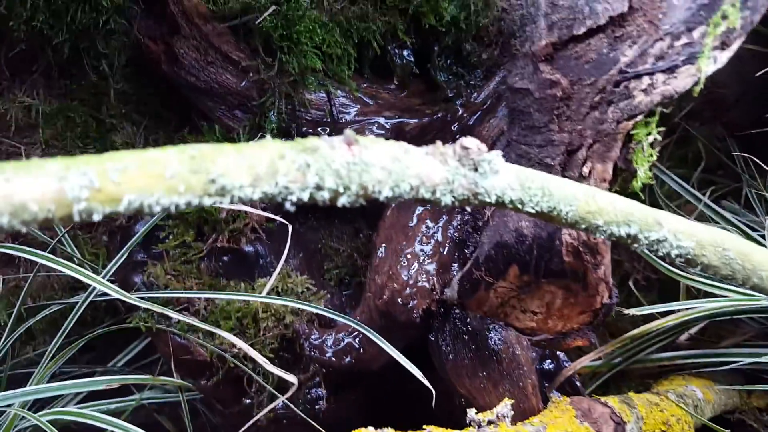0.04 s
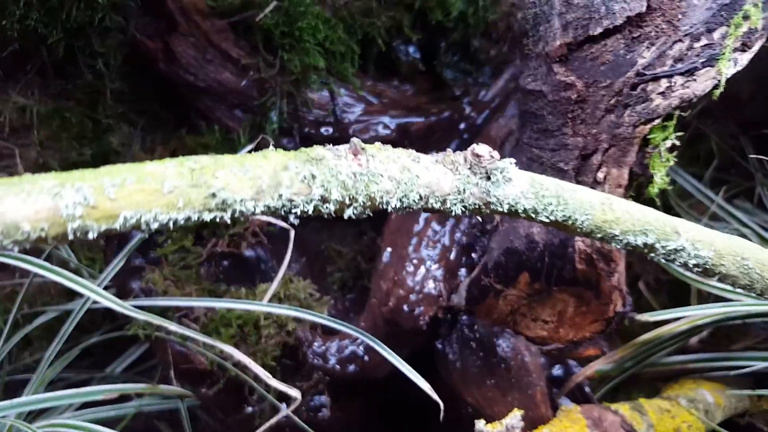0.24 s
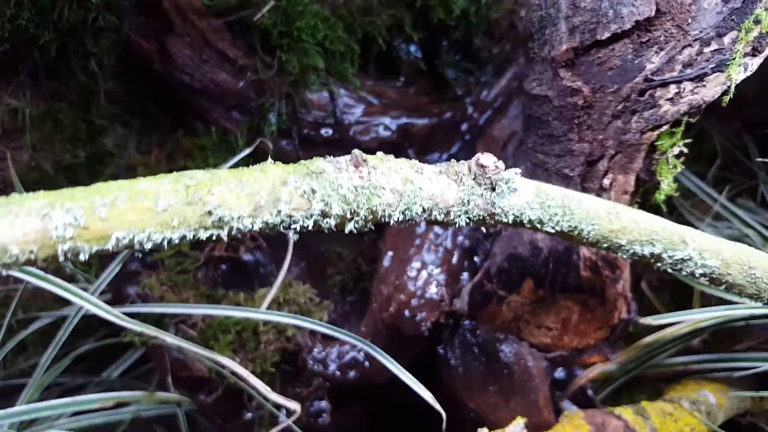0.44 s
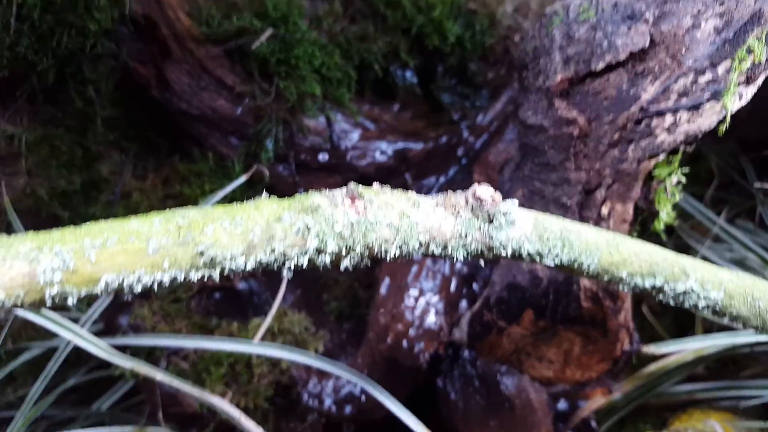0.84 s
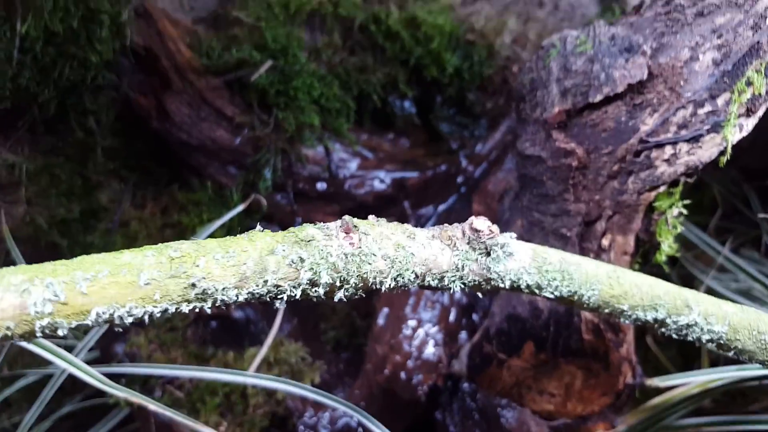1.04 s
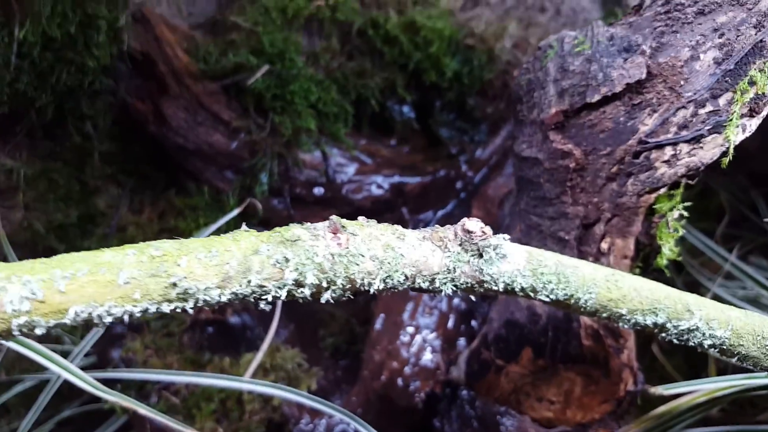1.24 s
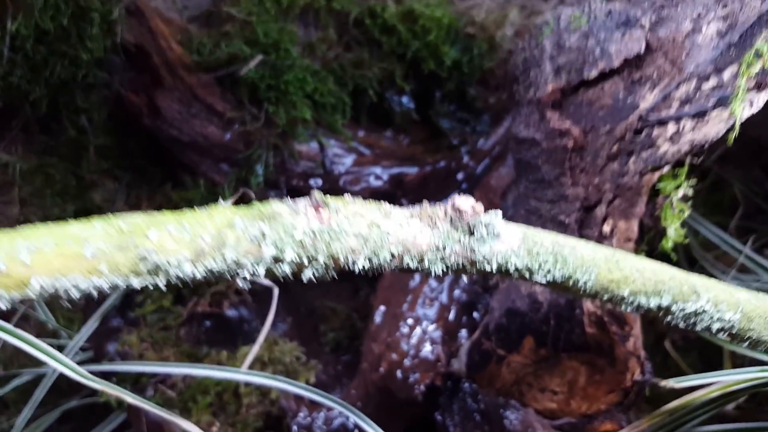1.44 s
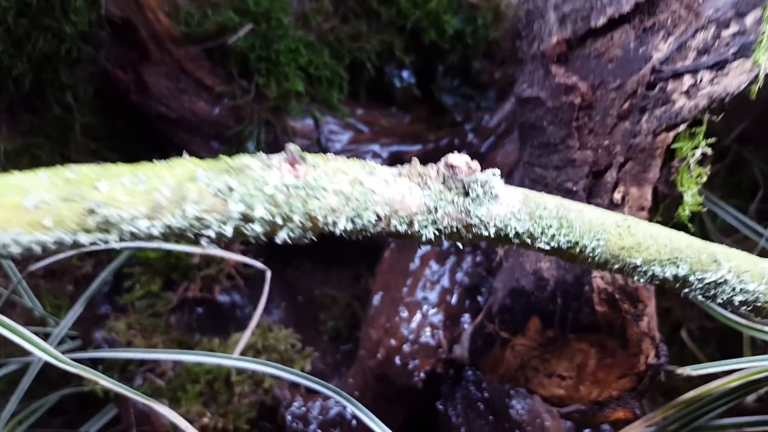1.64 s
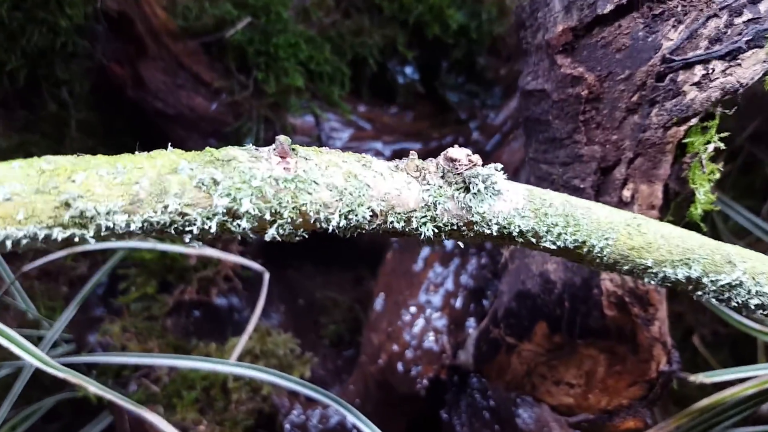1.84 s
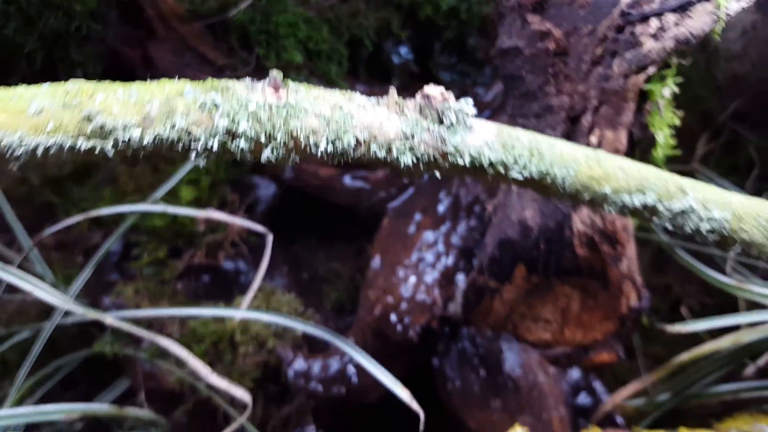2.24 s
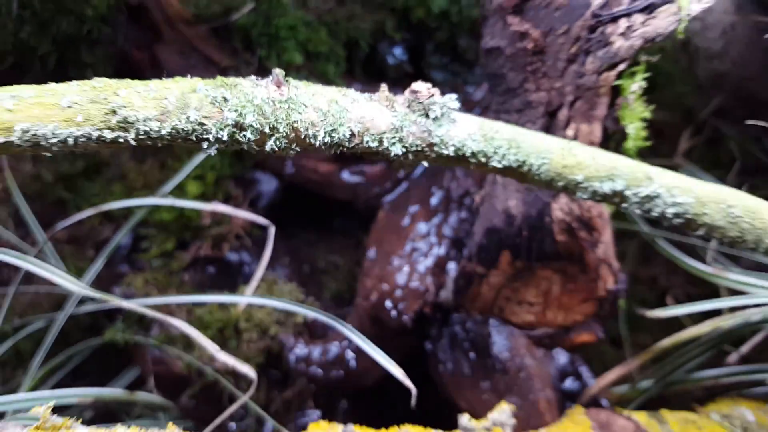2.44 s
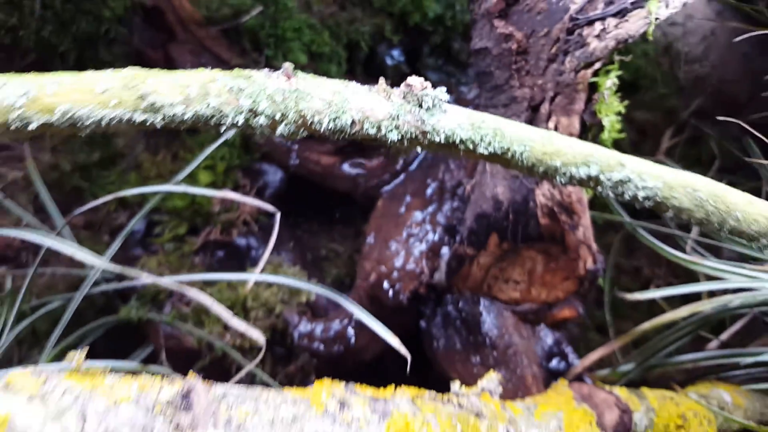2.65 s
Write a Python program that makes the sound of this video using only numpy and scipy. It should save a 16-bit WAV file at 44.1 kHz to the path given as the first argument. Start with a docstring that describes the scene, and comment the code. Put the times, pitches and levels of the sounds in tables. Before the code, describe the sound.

Water dripping irregularly onto wet wood, with short plips and tiny splashes.

```python
"""Water dripping in a hollow stump

Drops fall on wet wood and moss close to a stereo microphone. Each impact excites the damped modes of
the wood, throws a fizz of spray and traps a bubble that resonates; one drop plops into a puddle with
rising pitch. Faint droplets trickle between them in the small enclosure, over a low rumble, a faint
hiss, a machine hum and a far rush."""
import sys
import numpy as np
from scipy import signal
from scipy.fft import rfft, irfft, next_fast_len
from scipy.io import wavfile
from scipy.ndimage import uniform_filter1d, map_coordinates

SR = 44100
rng = np.random.default_rng(int(sys.argv[2]) if len(sys.argv) > 2 else 0)


def unload_wav(signal):
    """Save mono or channel-first audio to the path in sys.argv[1] as 16-bit WAV at rate SR, clipped to [-1, 1]."""
    wavfile.write(
        sys.argv[1],
        SR,
        np.round(np.clip(np.atleast_2d(signal).T, -1, 1) * 32767).astype(np.int16),
    )


N = 119070
SCENE_T, EVENT_T = np.arange(N) / SR, np.arange(2048) / SR  # time axes, t/s
IMPACT_ATTACK_S, TRICKLE_HZ, THUD_HZ = .0003, 2520, 750

# main drops: t/s, bubble f/Hz, bubble level/dB, knock level/dB, spray level/dB, left minus right/dB
DROPS = [(0.0746, 5340, -56, -60, -47, 2.5), (0.1706, 1358, -38, -44, -65.5, 3.5),
         (0.2706, 2540, -42, -44.5, -70, -1), (0.2795, 1960, -60, -41, -68, 1),
         (0.385, 3554, -40, -47.5, -44, 0), (0.391, 2956, -39.5, -43.5, -42.5, 2.5),
         (0.5174, 2200, -38, -39.5, -57.5, 1.5), (0.5333, 1404, -36.5, -45, -55, -0.5),
         (0.6132, 3920, -41, -56, -61, 4), (0.7391, 2400, -38.5, -44.5, -55.5, 0.5),
         (0.892, 1951, -28, -33, -51.5, 1.5), (0.9742, 1928, -28.5, -37.5, -51, 3.5),
         (1.0556, 3260, -39.5, -40, -57.5, 5.5), (1.206, 1356, -40.5, -56, -58, 1),
         (1.2388, 4300, -44, -50.5, -53, 0.5), (1.282, 1360, -36.5, -46, -62, 1),
         (1.3105, 1960, -37.5, -40, -59, 3.5), (1.4706, 3135, -41, -57, -54, 0.5),
         (1.6764, 2993, -31, -44.5, -46, 1), (1.734, 5040, -45, -56, -53, 1),
         (1.7951, 2846, -39, -68, -44, 1), (1.8326, 1860, -42, -52, -46, 0.5),
         (1.8624, 3366, -43.5, -48, -50.5, 0), (1.8769, 1850, -39.5, -42.5, -66, 0),
         (2.1293, 1770, -45.5, -53, -58.5, 2), (2.2543, 2870, -44.5, -54, -49.5, 0),
         (2.4313, 1944, -41.5, -49, -57, 2)]
# small droplets, from low plips to fine splashes: t/s, f/Hz, level/dB
SMALL_DROPLETS = [(0.4187, 1395, -55), (0.446, 2630, -50), (0.4877, 3030, -53), (0.4983, 3600, -54.5),
                  (0.5246, 7180, -43.5), (0.6336, 2600, -51), (0.7638, 1344, -51), (0.8653, 9850, -55.5),
                  (0.939, 2880, -51.5), (0.981, 2550, -40.5), (1.0162, 3750, -47.5), (1.0467, 2180, -42),
                  (1.1866, 3090, -49), (1.186, 3980, -55), (1.244, 5640, -47.5), (1.2532, 1400, -48.5),
                  (1.3428, 10230, -41.5), (1.3738, 2300, -50), (1.415, 1490, -50.5), (1.4263, 1810, -47.5),
                  (1.43, 2430, -47.5), (1.47, 10370, -50), (1.485, 3330, -49), (1.5154, 6830, -51.5),
                  (1.711, 7540, -47), (1.7423, 1970, -38), (1.8137, 2020, -46.5), (1.815, 12800, -52.5),
                  (1.951, 1950, -56), (2.1532, 1810, -50), (2.155, 13400, -56.5), (2.225, 2750, -51),
                  (2.253, 13900, -49), (2.3299, 14300, -54.5), (2.5456, 1510, -54.5), (2.62, 2330, -55),
                  (2.6572, 1510, -55)]


def amp(db):
    """Amplitude ratio of a level in decibels."""
    return 10 ** (np.asarray(db) / 20)


def unit_rms(x):
    """Normalisation to an rms of 1."""
    return x / np.sqrt(np.mean(x ** 2) + 1e-20)


def equal_energy(x):
    """Normalisation of a transient to the energy of 200 samples at an rms of 1."""
    return x / np.sqrt(np.mean(np.sum(x ** 2, axis=-1)) / 200 + 1e-20)


def curve_at(points, hz):
    """Interpolation of (f/Hz, value) points on a logarithmic frequency axis."""
    f, value = np.transpose(points)
    return np.interp(np.log(hz + 1), np.log(f + 1), value)


def wobble(knots_per_s):
    """Smooth random modulation: a spline through Gaussian values."""
    return map_coordinates(rng.standard_normal(2048), [SCENE_T * knots_per_s], mode="mirror")


def filtered(x, response):
    """Linear filtering: the spectrum is multiplied by a frequency response."""
    n = x.shape[-1]
    padded = next_fast_len(2 * n)
    return irfft(rfft(x, padded) * response(np.fft.rfftfreq(padded, 1 / SR)), padded)[..., :n]


def add(track, onset_s, sound):
    """Superposition of a transient on a stereo track."""
    start = max(round(onset_s * SR), 0)
    if start < N:
        track[:, start:start + len(EVENT_T)] += sound[:, :N - start]


def envelope(t60_s, hold_s=0, attack_s=IMPACT_ATTACK_S):
    """Exponential damping: after onset and hold, the level falls 60 dB in t60_s."""
    decay = np.exp(-np.log(1000) * np.maximum(EVENT_T - hold_s, 0) / t60_s)
    return (1 - np.exp(-EVENT_T / attack_s)) * decay


def stereo_tone(hz, phase):
    """Path difference: a sine reaches the two microphones out of phase, each time from a new place."""
    # phase between the microphones: f/Hz, lead of the left/rad
    phase_lead = [(700, .4), (1380, -1.25), (1950, -.5), (2300, -1.85), (3000, -1.1), (6000, -1.2)]
    delay_s = .00004 * rng.standard_normal()
    lead = curve_at(phase_lead, hz) + 2 * np.pi * hz * delay_s
    return np.sin(phase + np.array([[.5], [-.5]]) * lead)


def panned(x, pan_db):
    """A level difference between left and right at constant total power."""
    return x * unit_rms(amp(np.array([[.5], [-.5]]) * pan_db))


def ambient_noise(spectrum):
    """Partly coherent noise: the two channels are most alike at long wavelengths."""
    # likeness of left and right: f/Hz, correlation coefficient
    coherence = [(60, 0.97), (300, 0.65), (4000, 0.022)]

    def mid_side_gains(f):
        angle = np.arccos(np.clip(curve_at(coherence, f), -1, 1)) / 2
        return amp(curve_at(spectrum, f)) * [np.cos(angle), np.sin(angle)]

    mid, side = filtered(rng.standard_normal((2, N)), mid_side_gains)
    return unit_rms(np.array([mid + side, mid - side]))


def machine_hum():
    """Three low partials with slight random amplitude and phase modulation."""
    # partials: f/Hz, rms level/dB
    partials = [(97, -66.5), (300, -77.5), (600, -71.5)]
    hum = np.zeros(N)
    for hz, db in partials:
        peak = np.sqrt(2) * amp(db + wobble(9.98))  # sways by about 1 dB
        drift_rad = .33 * wobble(17)
        hum += peak * np.sin(2 * np.pi * hz * SCENE_T + drift_rad)
    return hum


def far_rush():
    """Faint noise with a narrow spectral peak swells in the second half, then eases."""
    # spectral density: f/Hz, relative level/dB
    spectrum = [(350, 7.5), (750, 1.5), (1200, 2), (1420, 13), (1900, -57)]
    # swell: t/s, rms level/dB
    swell = [(1.0, -90), (1.9, -61), (2.7, -67.5)]
    return amp(np.interp(SCENE_T, *np.transpose(swell))) * ambient_noise(spectrum)


def rumble_and_hiss():
    """Stationary noise in two bands, one low and one broad and faint."""
    # spectral densities: f/Hz, relative level/dB
    rumble = [(22, -24), (42, -20), (62, -1), (95, 5.5), (120, -4), (180, -1.5), (280, -13.5), (700, -20.5),
              (1200, -35.5)]
    hiss = [(500, 7), (1200, 4), (1900, 6.5), (4200, 1), (16000, -14.5)]
    return amp(-58.5) * ambient_noise(rumble) + amp(-68) * ambient_noise(hiss)


def reverberation(x):
    """Wall reflections: convolution with a noise tail that decays most slowly in the bass."""
    # reverberation time of the enclosure: f/Hz, T60/s
    decay_times = [(300, 0.61), (1900, 0.15), (4000, 0.13), (12000, 0.13)]
    delay_s = .00047
    hz, t, noise = signal.stft(rng.standard_normal((2, SR // 2)), SR, nperseg=256)
    decay = np.exp(-np.log(1000) * t / curve_at(decay_times, hz)[:, None])
    tail = signal.istft(noise * decay, SR, nperseg=256)[1]
    tail *= np.clip(np.arange(tail.shape[1]) / SR / delay_s - 1, 0, 1)  # silent, then fades in
    return signal.fftconvolve(x, tail / np.linalg.norm(tail[0]), axes=1)[:, :N]


def noise_burst(spectrum, hold_s):
    """Damped noise, made grainy by amplitude modulation and coloured by a random spectral tilt."""
    grain_db = 4 * unit_rms(uniform_filter1d(rng.standard_normal(len(EVENT_T)), size=20))
    noise = rng.standard_normal((2, len(EVENT_T))) * amp(grain_db) * envelope(.024, hold_s)
    tilt_db_per_octave = 3.5 * rng.standard_normal()

    def colour(f):
        octaves = np.log2(np.maximum(f, spectrum[0][0]))
        return amp(curve_at(spectrum, f) + tilt_db_per_octave * octaves)

    return equal_energy(filtered(noise, colour))


def spray():
    """Fine spray thrown by an impact radiates a brief high-frequency fizz."""
    # spectral density: f/Hz, relative level/dB
    spectrum = [(2000, -28), (4500, 14.5), (8000, 18.5), (16000, 1)]
    return noise_burst(spectrum, hold_s=.0025)


def splash(hz, count=9):
    """Micro-bubbles resonate in quick succession; later ones tend to be smaller, hence higher."""
    log_spread, log_rise, span_s = .15, .25, .006
    progress = (np.arange(count) + rng.random(count)) / count
    pitches = hz * np.exp(log_spread * rng.standard_normal(count) + log_rise * (progress - .5))
    decay = envelope(t60_s=.0078)
    cluster = 0
    for f, onset_s in zip(pitches, span_s * progress):
        age = EVENT_T - onset_s
        cluster += stereo_tone(f, 2 * np.pi * f * age) * np.interp(age, EVENT_T, decay)
    return equal_energy(cluster)


def trickle():
    """Water falls back: two faint splashes follow each drop and droplet at exponential random lags."""
    mean_lag_s, log_spread = .05, .405
    out = np.zeros((2, N))
    impacts = np.repeat([row[0] for row in DROPS + SMALL_DROPLETS], 2)
    onsets = impacts + mean_lag_s * rng.exponential(size=len(impacts))
    for onset_s, (pitch_draw, level_draw) in zip(onsets, rng.standard_normal((len(onsets), 2))):
        hz = TRICKLE_HZ * np.exp(log_spread * pitch_draw)
        add(out, onset_s, amp(-64.5 + 3 * level_draw) * splash(hz, count=4))
    return out


def bubble(hz):
    """Trapped air resonates, rising slightly in pitch; the finer the bubble, the more splash is heard."""
    hold_s, relative_rise_per_s, equal_splash_hz = .0035, 3, 5400
    phase = 2 * np.pi * hz * (EVENT_T + relative_rise_per_s * EVENT_T * (EVENT_T / 2 - hold_s))
    ring = equal_energy(stereo_tone(hz, phase) * envelope(.02, hold_s, attack_s=.0005))
    return equal_energy(ring + (hz / equal_splash_hz) ** 2 * splash(hz))


def droplets():
    """Bubble resonance makes low droplets plip; fine ones are mostly splash with a trace of spray."""
    crossover_hz = 3300
    out = np.zeros((2, N))
    for onset_s, hz, db in SMALL_DROPLETS:
        spatter = splash(hz) + amp(-9.5) * spray()
        add(out, onset_s, amp(db) * equal_energy(bubble(hz) + hz / crossover_hz * spatter))
    return out


def thud():
    """The push of a drop's weight: a heavily damped oscillation, a few cycles long."""
    return equal_energy(stereo_tone(THUD_HZ, 2 * np.pi * THUD_HZ * EVENT_T) * envelope(t60_s=.011))


def plop():
    """A drop thuds into the puddle; its gurgling bubble resonates higher as it nears the surface."""
    # path of the fading bubble: t/s, f/Hz, rms level/dB
    glide = [(2.014, 1150, -39.5), (2.015, 1370, -44), (2.0204, 1450, -46), (2.023, 2030, -43.5),
             (2.036, 2115, -52)]
    log_warble, flutter_db, knots_per_s = .07, 3, 500
    times, pitches, levels = np.transpose(glide)
    hz = np.interp(SCENE_T, times, pitches) * np.exp(log_warble * wobble(knots_per_s))
    db = np.interp(SCENE_T, times, levels) + flutter_db * wobble(knots_per_s)
    sounding = (SCENE_T > times[0]) & (SCENE_T < times[-1])
    out = np.sqrt(2) * amp(db) * sounding * stereo_tone(hz, 2 * np.pi * np.cumsum(hz) / SR)
    add(out, times[0], amp(-50.5) * (thud() + .5 * splash(TRICKLE_HZ)))
    return out


def knock():
    """Impact excitation: the damped modes of wet wood ring under the splat of the drop."""
    # modes of the hollow wood: f/Hz, relative level/dB
    modes = [(730, -13), (1380, -8.5), (1950, 3), (2360, 3), (2850, 1.5), (3260, -12)]
    # spectral density of the splat: f/Hz, relative level/dB
    splat = [(1100, -23), (2000, -15), (3200, 16), (4800, -6), (7000, -17)]
    t60_s, hold_s, scatter_db = .023, .0015, 3
    ring = 0
    for hz, db in modes:
        gain = amp(db + scatter_db * rng.standard_normal())
        ring += gain * stereo_tone(hz, 2 * np.pi * (hz * EVENT_T + rng.random()))
    ring = equal_energy(ring * envelope(t60_s, hold_s))
    return equal_energy(ring + amp(-3) * noise_burst(splat, hold_s))


def drips():
    """Each impact superposes bubble, knock and spray; big drops, with low bubbles, thud more."""
    out = np.zeros((2, N))
    for onset_s, hz, bubble_db, knock_db, spray_db, pan_db in DROPS:
        body = bubble(hz) + amp(-13) * THUD_HZ / hz * thud()
        drop = amp(bubble_db) * body + amp(knock_db) * knock() + amp(spray_db) * spray()
        add(out, onset_s, panned(drop, pan_db))
    return out


def scene():
    """Superposition of the water's direct sound, its weak reverberation and the background."""
    water = drips() + droplets() + plop() + trickle()
    return water + amp(-12) * reverberation(water) + machine_hum() + far_rush() + rumble_and_hiss()


def record(dry):
    """Band limiting: an ideal low-pass filter removes the highest treble."""
    return filtered(dry, lambda hz: hz < 16100)


dry = scene()
out = record(dry)
unload_wav(out)
```